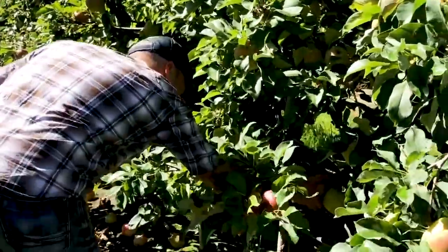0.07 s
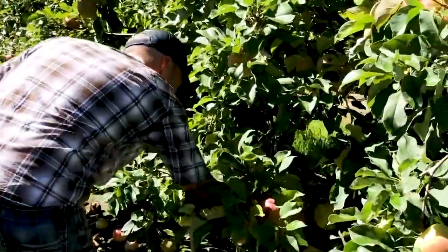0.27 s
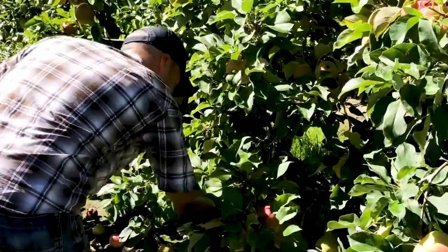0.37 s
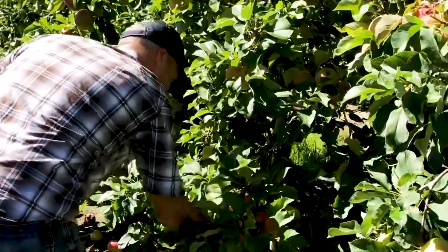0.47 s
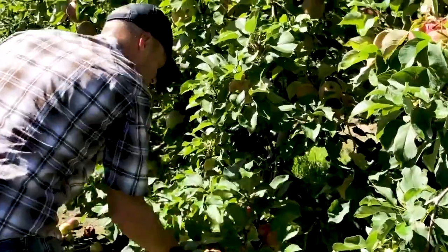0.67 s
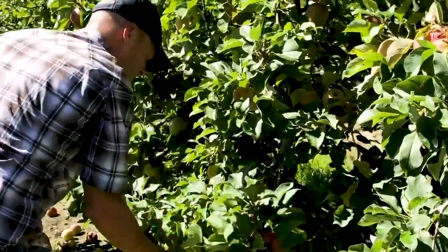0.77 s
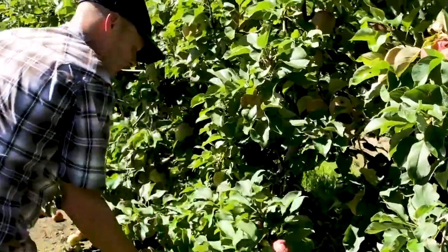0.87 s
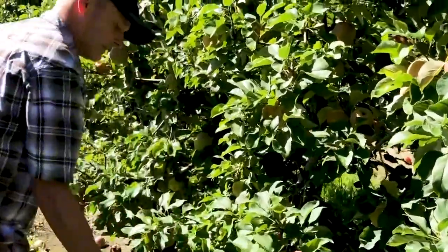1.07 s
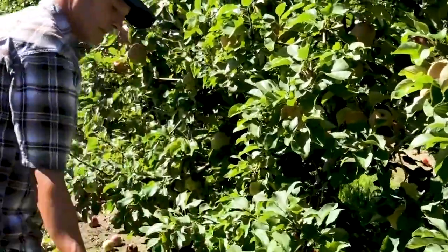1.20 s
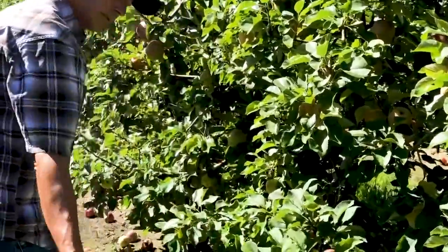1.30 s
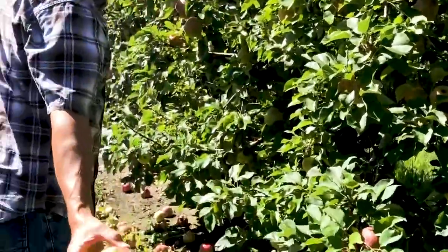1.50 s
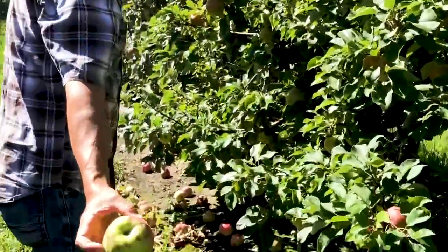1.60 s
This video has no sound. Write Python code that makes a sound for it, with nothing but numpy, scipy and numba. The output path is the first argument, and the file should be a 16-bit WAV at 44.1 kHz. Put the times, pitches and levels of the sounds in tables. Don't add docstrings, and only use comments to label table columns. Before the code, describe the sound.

An apple stem snaps sharply, the branch springs back with rustling leaves and dry twig clicks, then another apple thuds and bounces on grass; faint scuffs follow, in a quiet orchard, close mono microphone.

```python
import sys
import numpy as np
from scipy import signal
from scipy.fft import rfft, irfft
from scipy.io import wavfile
from scipy.ndimage import uniform_filter1d
from numba import njit

SR = 44100
rng = np.random.default_rng(int(sys.argv[2]) if len(sys.argv) > 2 else 0)


def master(y):
    cut = np.clip(np.atleast_2d(y).T, -1, 1)
    pcm = np.round(cut * 32767)
    wavfile.write(sys.argv[1], SR, pcm.astype(np.int16))


def boost(x):
    u = np.asarray(x, float) / 20
    return 10 ** u


N = 72765
t = np.arange(N) / SR

# (time [s], level [dB])
FIBRE_TEARS = [
    (.2211, -19),
    (.22155, -8.5),
    (.2232, -17),
    (.2245, -18),
    (.2272, -25),
    (.2300, -26),
    (.2322, -27),
]
# (pitch [Hz], level [dB], time to fade by 60 dB [s])
STEM_TONES = [(950, -14.5, 0.06), (1330, -10, 0.045), (1490, -11, 0.04), (1640, 2, 0.007),
              (1835, -10, 0.012), (2300, -9, 0.028), (2555, -6, .018), (3180, -7, 0.015),
              (4030, -15, 0.043), (4380, -11, 0.03), (5500, -7, 0.008), (6400, -11, 0.012),
              (9120, -14, .006), (14300, -19, .004)]
# (pitch [Hz], level [dB], time to fade by 60 dB [s])
BRANCH_TONES = [(30, -14, 0.12), (58, 0, .1), (74, -1, 0.1), (140, -5, 0.081), (290, -6, 0.094)]
# (time [s], level [dB])
BRANCH_JERKS = [
    (0.2098, -38.5),
    (0.2182, -36.5),
]
# (pitch [Hz], level [dB], time to fade by 60 dB [s])
FLESH_TONES = [(236, 4, 0.047), (310, -12, .03), (340, -7, 0.037), (533, -10, 0.036)]
# (time [s], level [dB])
LANDINGS = [
    (0.7235, -27),
    (0.7376, -33),
    (0.7607, -42),
]
# (pitch [Hz], level [dB], time to fade by 60 dB [s])
SKIN_TONES = [(259.8, -3, 0.4), (520, -2, 0.03), (920, 4.5, .012), (1140, 2, 0.019), (1280, -7, 0.032),
              (2100, 3, .015), (2750, -2, 0.025)]
# (time [s], level [dB])
SKIN_SLAP = [
    (.7222, -36),
]
# (time [s], level [dB], lowest crinkle pitch [octaves above 1 kHz])
LEAF_SHAKE = [(0, -64.5, 0.45), (0.049, -67, 0.33), (.10, -143, 4.4), (.15, -80, 1.3), (.2207, -48, 1.0),
              (.2225, -35, .9), (.245, -35, 0.37), (.30, -41.5, 0.77), (0.374, -48.5, 0.96),
              (0.407, -41.5, 0.3), (0.478, -42.5, .6), (0.569, -40.5, 1.39), (0.604, -46.5, 1.35),
              (.73, -47, 1.55), (.77, -53.5, 1.88), (0.957, -53.5, 1.82), (0.991, -66, 1.8),
              (1.051, -76.5, 0.83)]
# (pitch [Hz], level [dB per Hz])
LEAF_COLOUR = [(240, -47), (400, -25), (1230, -3.5), (2020, -3), (2250, -5), (4580, -3.5), (7510, -7.5),
               (11000, -14.5), (16000, -21)]
# (time [s], level [dB], pitch [Hz], length [cycles])
TICKS = [(.0068, -34, 2100, 6), (0.191, -45, 2150, 5.4), (0.2183, -31, 2070, 12), (0.3838, -33, 2640, 11),
         (.385, -25.5, 3900, 10), (.393, -38.5, 1200, 18), (0.4045, -22, 3100, 6), (0.4163, -24, 3350, 4),
         (0.4175, -25, 2350, 16), (.425, -29, 3300, 8), (.430, -29, 3000, 5), (0.437, -28, 4200, 6),
         (.444, -31, 4500, 25), (.451, -28, 4500, 12), (.4632, -27, 3000, 4), (.4655, -28, 2800, 4),
         (0.487, -28, 3330, 22), (.4945, -28, 2500, 4), (.787, -42, 7350, 90), (0.9, -46, 2280, 45),
         (.913, -54, 1900, 8), (.925, -39, 3700, 18), (.928, -48, 2100, 8), (0.9458, -36, 5080, 8),
         (.950, -28, 5370, 7.7), (1.069, -35, 6500, 3.3), (1.19, -42, 9000, 8), (1.30, -44, 6200, 6),
         (1.4145, -40, 4600, 14), (1.4272, -33, 4600, 10), (1.4293, -38, 1800, 5), (1.432, -41, 5000, 8),
         (1.439, -42, 4200, 12), (1.457, -46, 4500, 10), (1.4296, -30, 14500, 6), (1.4291, -30, 4270, 13.6),
         (1.431, -43, 478, 7.2), (1.439, -46.5, 347, 5.6), (1.4297, -26, 8500, 5.7),
         (1.575, -52, 6000, 2.64)]
# (time of peak [s], length [s], level [dB], centre [Hz], width [octaves])
BRUSHES = [(.008, 0.045, -60.5, 1900, 0.4), (0.12, 0.08, -71, 1700, .4), (0.404, 0.064, -56, 592, 0.39),
           (0.733, 0.039, -48, 1188, 1.1), (0.823, 0.17, -70, 1092, 0.71), (0.915, 0.021, -70, 2400, 0.5),
           (1.375, .03, -66, 900, 1.0), (1.42, .03, -53, 8800, .22), (1.428, .025, -56, 15000, .15),
           (.435, .03, -58, 640, .2), (.165, .03, -69, 6500, .5), (.03, .03, -68, 7000, .6),
           (0.996, 0.048, -73, 1470, 0.66), (1.08, 0.018, -56, 1300, 0.28), (1.105, 0.02, -59, 1150, 0.24),
           (1.135, .012, -58, 1050, .12), (1.08, 0.11, -58.5, 4320, 1.41), (1.16, 0.08, -58.5, 14500, 0.15),
           (1.172, 0.02, -59, 1300, 0.09), (1.21, .02, -65, 1400, .2), (1.33, .07, -64, 12000, .6),
           (0.77, 0.12, -67, 7400, 0.21), (1.253, 0.14, -71, 1470, 0.76), (1.19, 0.05, -60, 9200, 0.22),
           (1.2, .1, -70, 7000, .3), (1.395, .05, -58, 7600, 0.5), (1.41, .016, -50, 4500, 1.1),
           (1.433, .025, -52, 5000, 0.9), (1.435, .022, -56, 4450, .12), (1.428, 0.025, -54, 480, 0.8),
           (1.527, 0.03, -68, 1400, 0.35)]
# (pitch [Hz], level [dB per Hz])
AIR_COLOUR = [(25, -8), (75, -27.5), (185, -5), (700, -31), (2000, -33), (4000, -54), (9300, -29),
              (16000, -30)]
# (pitch [Hz], width [Hz], level [dB])
HUM = [(132.9, 30, -70.5), (178.8, 4.7, -74), (227.5, 60, -78.5)]


def level(x, db):
    return x * boost(db) / np.sqrt(np.mean(x ** 2))


def colour(table, hz):
    table = np.array(table)
    return np.interp(np.log(hz), np.log(table[:, 0]), table[:, 1])


def band(x, hz, width):
    return signal.lfilter(*signal.iirpeak(min(hz, .45 * SR), hz / width, SR), x)


def highpass(x, hz):
    return signal.sosfilt(signal.butter(4, hz, "high", fs=SR, output="sos"), x)


@njit
def rings(start, hz, t60, size, phase, length, sr, rise):
    out = np.zeros(length)
    for k in range(len(start)):
        turn = np.exp(2j * np.pi * hz[k] / sr - np.log(1000.) / (t60[k] * sr))
        z = size[k] * np.exp(1j * phase[k])
        first = int(start[k] * sr)
        unrisen, rise_step = 1., np.exp(-hz[k] / sr / rise)
        for i in range(max(first, 0), min(length, first + int(t60[k] * sr) + 2)):
            z *= turn
            unrisen *= rise_step
            out[i] += z.imag * (1 - unrisen) ** 2
    return out


def walk(rate):
    k = int(SR / rate)
    steps = np.repeat(rng.standard_normal(N // k + 1), k)
    return 1.3 * uniform_filter1d(uniform_filter1d(steps, k), k)[:N]


def struck(tones, hits):
    tones, hits = np.array(tones), np.array(hits)
    vary = rng.standard_normal((len(hits), len(tones), 2))
    start = np.repeat(hits[:, 0], len(tones))
    size = boost(hits[:, 1:] + tones[:, 1] + 2 * vary[..., 0]).ravel()
    hz = (tones[:, 0] * (1 + .008 * vary[..., 1])).ravel()
    t60 = np.tile(tones[:, 2], len(hits))
    return rings(start, hz, t60, size, 0 * start, N, 1. * SR, .15)


def stem_snap():
    low_cut_hz, snap_db = 920, -2.5
    snap = struck(STEM_TONES, FIBRE_TEARS)
    return boost(snap_db) * highpass(highpass(snap, low_cut_hz), low_cut_hz)


def branch_spring():
    return struck(BRANCH_TONES, BRANCH_JERKS)


def apple_thud():
    low_cut_hz, ring_stop_s, ring_fade_s = 150, .809, .004
    still_ringing = np.clip((ring_stop_s - t) / ring_fade_s, 0, 1)
    skin = struck(SKIN_TONES, SKIN_SLAP) * still_ringing
    return highpass(struck(FLESH_TONES, LANDINGS) + skin, low_cut_hz)


def leaves():
    cycles, scatter_db, flutter_db, edge_db_per_octave = 10., 4.6, 1.3, 20
    shake = np.array(LEAF_SHAKE)
    c = rng.random((45000, 5)).T
    at, hz = 1.06 * c[0], 500 + 15300 * c[1] ** 1.496
    lowest = np.interp(at, shake[:, 0], shake[:, 2])
    octaves_below = np.maximum(lowest - np.log2(hz / 1000), 0)
    db = colour(LEAF_COLOUR, hz) + 5.1 * np.log10(hz / 4000) - edge_db_per_octave * octaves_below
    db = db + np.minimum(-scatter_db * np.log(c[2]), 14)
    db = db + flutter_db * walk(90)[(at * SR).astype(int)]
    t60 = cycles * (1.8 + 1.2 * c[3]) * np.sqrt(hz / 3000) / hz
    x = rings(at, hz, t60, boost(db), 2 * np.pi * c[4], N, 1. * SR, 0.31)
    return level(x, 0.1) * boost(np.interp(t, shake[:, 0], shake[:, 1], right=-120))


def ticks():
    splinter_db, splinter_s, splinter_octaves = -11.5, 0.0071, 0.32
    k = np.array(TICKS)
    c = rng.random((len(k), 7, 3))
    main = np.arange(7) == 0
    at = k[:, :1] + np.where(main, 0, splinter_s * (c[..., 0] ** 2 * 2.0 - .3))
    octaves = np.where(main, 0, splinter_octaves * (4 * c[..., 1] - 2))
    hz = np.minimum(k[:, 2:3] * 2 ** octaves, 15600)
    db = k[:, 1:2] + np.where(main, -2, splinter_db - 8 * c[..., 2])
    t60 = 2 * k[:, 3:] / hz
    return rings(at.ravel(), hz.ravel(), t60.ravel(), boost(db).ravel(), 0 * at.ravel(), N, 1. * SR, 0.21)


def brushes():
    hiss_share, cycles, rise_share, flutter_db = .75, 12, 0.42, 0.86
    out = 0
    pitch = np.maximum(np.arange(N // 2 + 1) * SR / N, 20)
    for peak, length, db, centre_hz, octaves in BRUSHES:
        c, spread = rng.random((1500, 3)).T, rng.standard_normal(1500)
        at = peak + length * (5 * c[0] - 2)
        hz = np.clip(centre_hz * 2 ** (octaves * spread), 100, 15800)
        size = boost(np.minimum(-2.2 * np.log(c[1]), 10)) * np.sqrt(hz) * (at > 0)
        t60 = 2 * cycles / min(octaves, 1) / hz
        crinkles = rings(at, hz, t60, size, 2 * np.pi * c[2], N, 1. * SR, 0.48)
        crinkles = crinkles / np.sqrt(np.sum(crinkles ** 2) / (5 * length * SR))
        bell = np.exp(-(np.log2(pitch / centre_hz) / octaves / 2) ** 2) / np.sqrt(pitch)
        hiss = level(irfft(rfft(rng.standard_normal(N)) * bell, N), 0)
        x = np.sqrt(1 - hiss_share) * crinkles + np.sqrt(hiss_share) * hiss
        d = (t - peak) / length
        swell = np.exp(-np.abs(np.where(d < 0, d / rise_share, d)) ** 1.56)
        out = out + x * boost(db + flutter_db * walk(70)) * swell
    return out


def distant_air():
    out = 0
    for hz in 25 * 2 ** np.arange(0, 9.3, 1 / 3):
        noise = band(band(rng.standard_normal(N), hz, hz / 3), hz, hz / 3)
        out = out + boost(colour(AIR_COLOUR, hz) + 0.88 * walk(7)) * noise
    return level(out, -64.5)


def distant_hum():
    return sum(level(band(rng.standard_normal(N), hz, width), db) for hz, width, db in HUM)


def scene():
    apples = stem_snap() + branch_spring() + apple_thud()
    rustle = leaves() + ticks() + brushes()
    return (apples + rustle + distant_air() + distant_hum())[None]


def low_pass(x):
    return signal.sosfilt(signal.butter(12, 16760, fs=SR, output="sos"), x)


def record(dry):
    dip_hz, dip_width_hz, dip_share, top_hz = 11900, 5500, .8, 15850
    near = dry - dip_share * band(dry, dip_hz, dip_width_hz)
    near = signal.sosfilt(signal.ellip(8, .2, 50, top_hz, fs=SR, output="sos"), near)
    return low_pass(near)


dry = scene()
out = record(dry)
master(out)
```